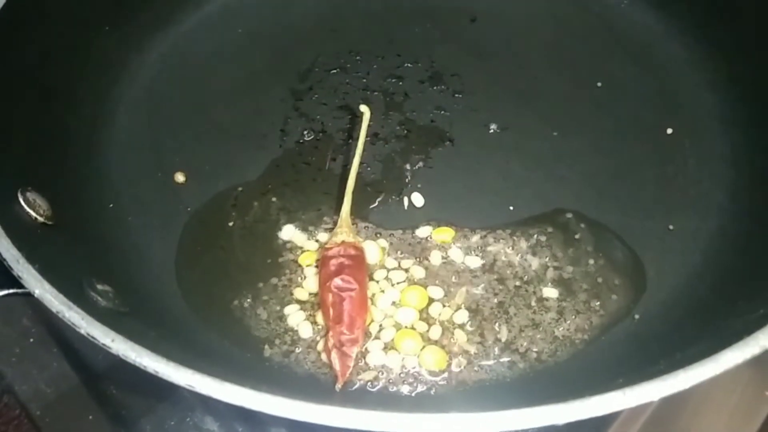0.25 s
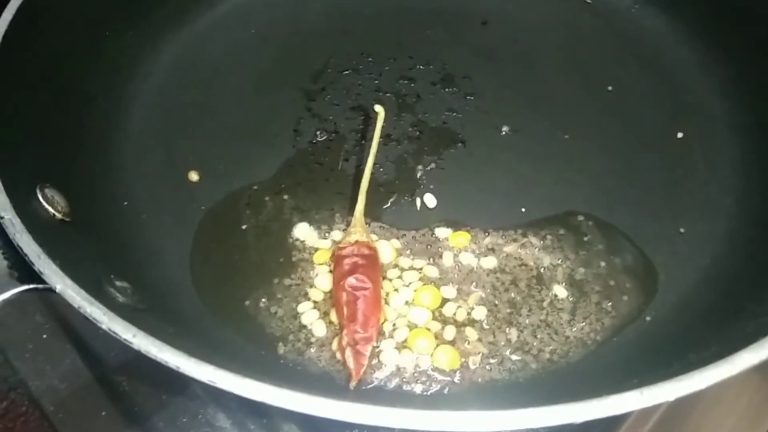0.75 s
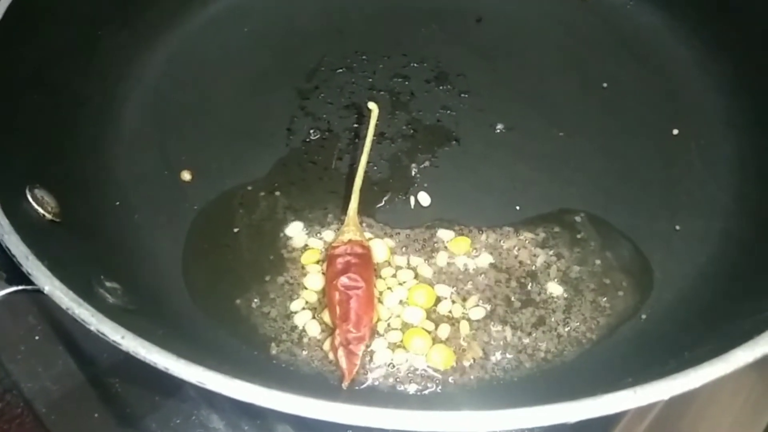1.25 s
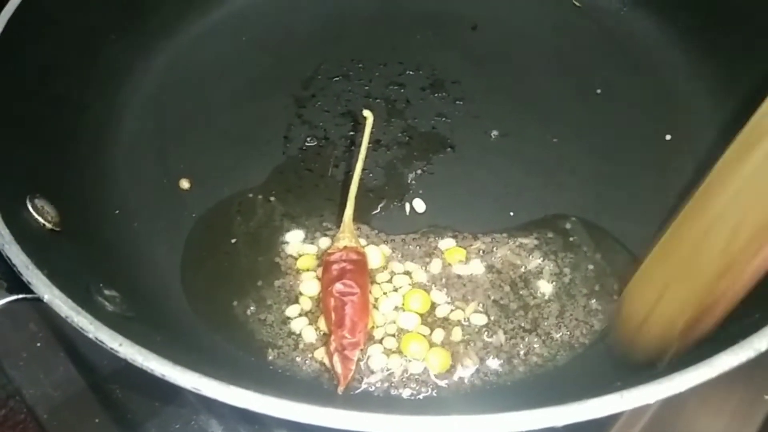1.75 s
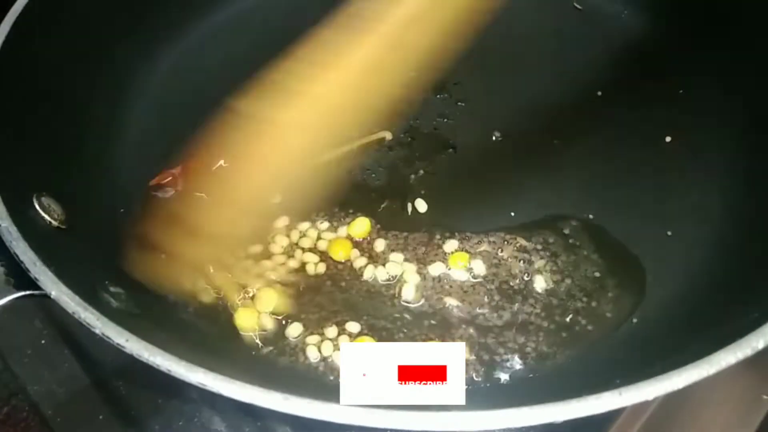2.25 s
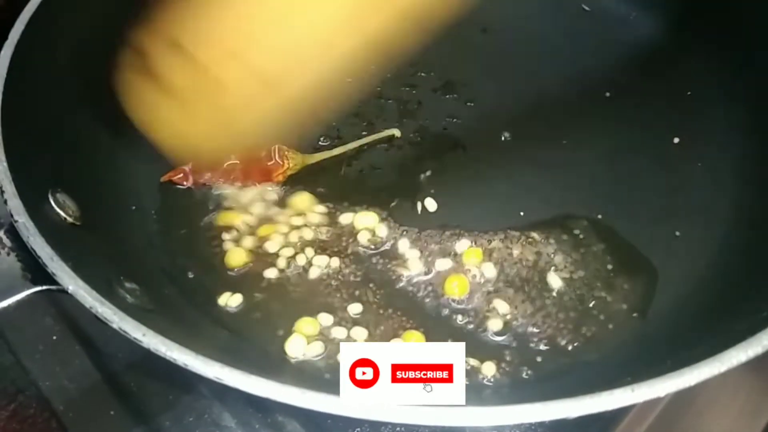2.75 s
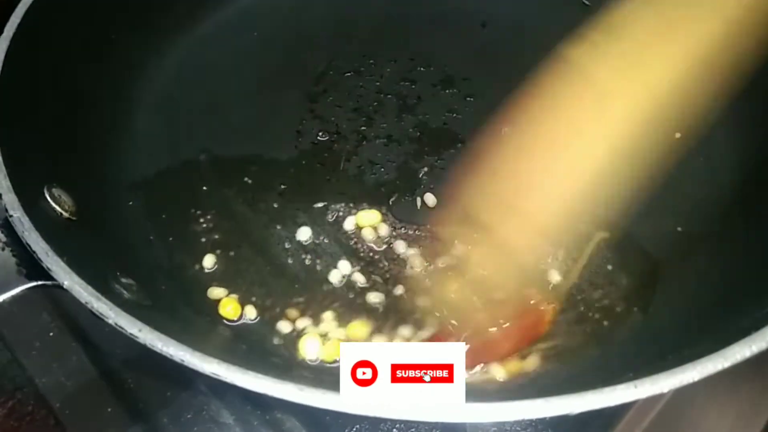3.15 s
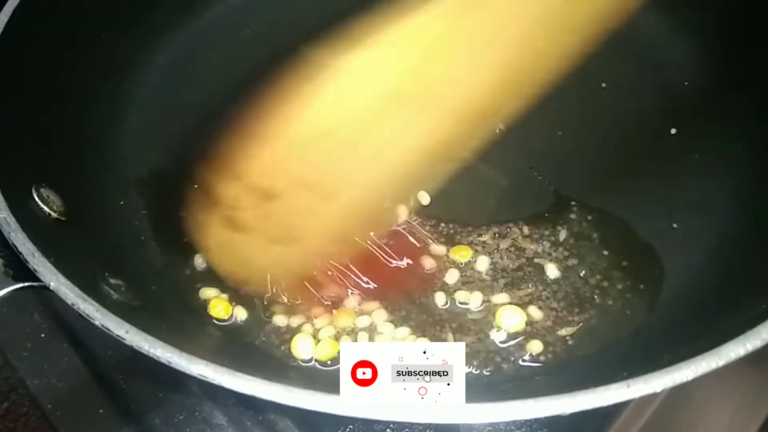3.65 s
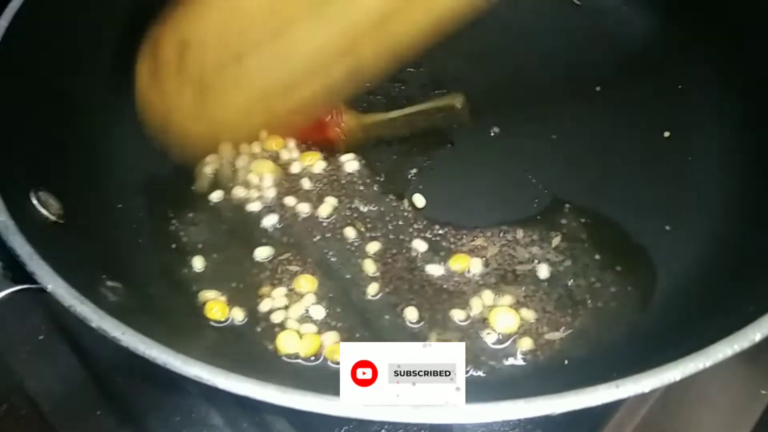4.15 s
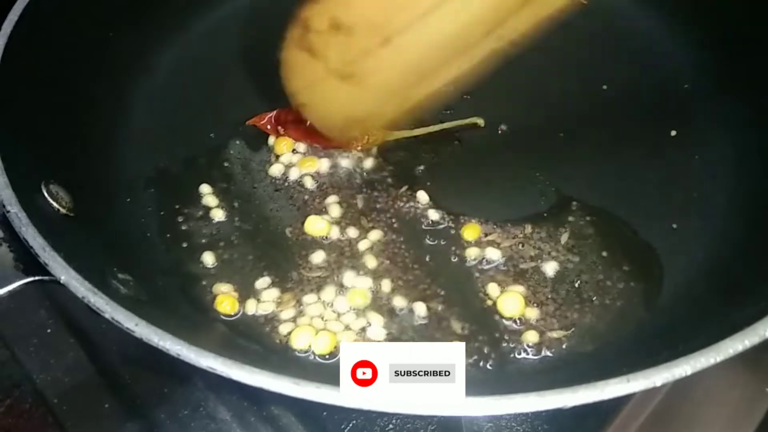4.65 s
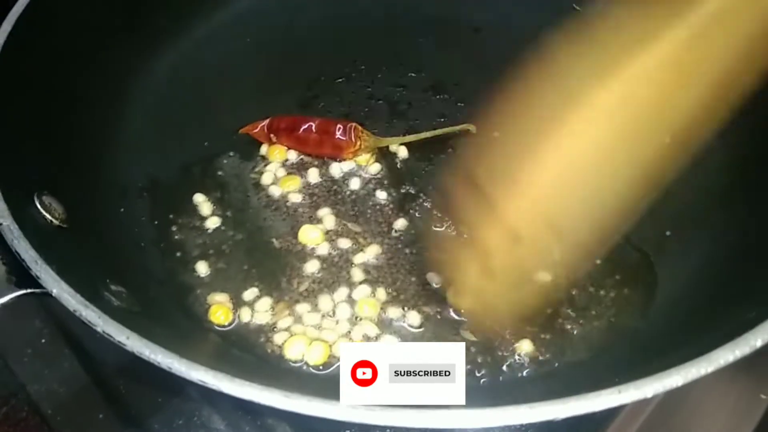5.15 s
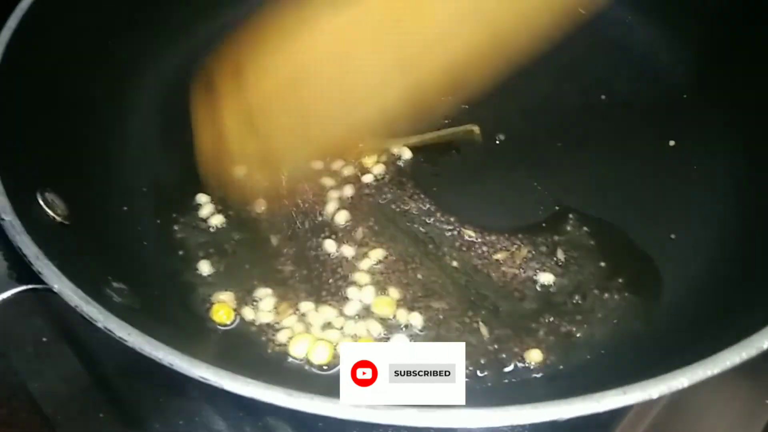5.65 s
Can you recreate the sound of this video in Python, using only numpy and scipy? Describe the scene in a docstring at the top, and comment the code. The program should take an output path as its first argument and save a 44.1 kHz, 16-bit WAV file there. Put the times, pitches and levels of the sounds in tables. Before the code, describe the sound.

A close microphone over a frying pan catches a steady fine sizzle with a low rumble beneath. Cookware rattles briefly near the start, with hard-walled kitchen echo. After a calm moment, wood clacks and rubs grittily on the ringing pan in quick repeated strokes, the sizzle swelling each time. It finishes thinner and higher, with crackling seed pops.

```python
"""Seeds and lentils sizzle in a little oil in a pan, heard from close above in a small kitchen.
Noise and random clicks, coloured by filters, make the sizzle; it swells at each knock and spatula stroke.
After a soft thump, cookware clatters once: short noise bursts through metal resonances. Then a wooden spatula
knocks (noise clacks, booms, ringing tones) and scrapes (random jolts) about three times a second.
Seeds pop as tiny noise bursts, more towards the end; a low rumble and two faint wavering tones lie underneath."""
import sys
import numpy as np
from scipy import signal
from scipy.fft import rfft, irfft, next_fast_len
from scipy.io import wavfile
from scipy.ndimage import map_coordinates

SR = 44100
rng = np.random.default_rng(int(sys.argv[2]) if len(sys.argv) > 2 else 0)


def to_wav(sig):
    """Store sig (one row per channel, or 1-D mono) as 16-bit WAV at the path in sys.argv[1].

    Samples outside -1..1 are clipped; the rate is SR.
    """
    pcm = np.clip(np.atleast_2d(sig), -1, 1) * 32767
    pcm = np.round(pcm).astype(np.int16)
    wavfile.write(sys.argv[1], SR, pcm.T)  # frames by channels


N = 260707  # length in samples

# All spectra and resonance levels are relative; the functions set the loudness of each layer.
# bubbling of the undisturbed oil: (t/s, level/dB)
SIMMER_LEVEL = [(0.19, -51), (0.43, -42), (0.93, -50), (1.35, -50), (3.4, -50.5), (4.4, -48.5),
                (5.43, -47.5), (5.84, -45.5)]
# sweeps of the spatula: (t/s of hardest push, force level/dB, swell/s, release/s, oil flare level/dB)
SPATULA_STROKES = [(1.561, -33, 0.1, 0.17, -36.5), (1.809, -42, .04, 0.18, -47.5),
                   (1.961, -35, 0.063, 0.044, -42.5), (2.288, -37, 0.15, 0.11, -37),
                   (2.582, -31.5, 0.048, .13, -37.5), (2.961, -40, 0.15, 0.2, -42),
                   (3.206, -36.5, 0.022, 0.19, -42), (3.53, -39, 0.078, 0.34, -41.5),
                   (3.832, -39, 0.15, 0.14, -41), (4.199, -32.5, 0.086, 0.079, -40),
                   (4.555, -35, 0.074, .14, -39.5), (4.892, -39, 0.033, 0.17, -40.5),
                   (5.289, -37.5, 0.064, 0.19, -42.5), (5.46, -46.5, 0.12, 0.075, -63)]
# knocks on the pan, first a soft thump, then the wooden spatula: (t/s, clack peak level/dB,
# belly level/dB before its gain, ring level/dB before its gain, belly f/Hz)
PAN_KNOCKS = [(0.031, -40.5, -43.5, -53, 306), (1.409, -25.5, -39.5, -42.5, 288),
              (1.817, -16.5, -38, -47, 305), (2.12, -11, -36.5, -43.5, 262),
              (2.522, -17.5, -36, -46.5, 298), (2.835, -35.5, -42, -52.5, 225), (3.222, -41, -51, -43, 200),
              (3.47, -28.5, -36.5, -41, 238), (3.802, -35, -53, -47, 247),
              (4.073, -20.5, -34.5, -40.5, 232), (4.458, -56.5, -39.5, -76, 224),
              (4.8, -16.5, -37.5, -48, 212), (5.176, -60, -46.5, -83, 197)]
# colour of the sizzle, first the fuller one, then the finer one: (f/Hz, level/dB)
OIL_SPECTRUM = [(700, -41), (1200, -34), (1480, -10.5), (1750, -8.5), (2250, -10), (2700, 3.5), (3100, 3),
                (3900, -7), (4600, -14), (5200, -6.5), (6500, -2.5), (7800, 3), (9500, -7), (12000, -17),
                (15500, -22.5)]
FINE_OIL_SPECTRUM = [(800, -53), (1400, -15), (2300, 2), (3300, -8.5), (5000, -3), (6000, 1), (7900, 2),
                     (10000, -3), (15500, -8.5)]
# colour of the stove's low rumble: (f/Hz, level/dB)
RUMBLE_SPECTRUM = [(25, -15), (60, 1.5), (113, 0), (200, -16.5), (300, -11.5), (420, -22), (1000, -24.5),
                   (3000, -37)]
# faint wavering hum in the kitchen: (f/Hz, level/dB)
HUM_TONES = [(113, -79.5), (296, -78)]
# faint rubbing: a dying remnant of an earlier sound at first,
# then cookware sliding before it clatters: (t/s, level/dB)
FAINT_RUBBING = [(0, -55), (0.265, -67), (0.29, -46), (0.36, -54.5), (0.42, -52.5), (0.5, -56.5)]
# colour of the rubbing on the pan: (f/Hz, level/dB)
RUB_SPECTRUM = [(50, -20.5), (100, -18), (170, -18.5), (290, -13), (430, -34), (640, -13.5), (1200, -7.5),
                (1900, -17), (2300, -4), (2750, 4), (3200, -14.5), (3650, -1), (4400, -14), (6000, 0),
                (14000, -49.5)]
# voices of seeds grating under the blade: (f/Hz, sharpness Q, level/dB)
GRIT_VOICES = [(1135, 10, -6), (1909, 23, -3.5), (2400, 34, -5), (2790, 26, 2.5), (3180, 17, -14),
               (3600, 15, 3.5), (6600, 4.6, -5.5)]
# colour of the husks: (f/Hz, level/dB)
HUSK_SPECTRUM = [(600, -18), (2500, 1.5), (4500, -8.5), (7800, 6.5), (10500, -4), (15000, -11.5)]
# colour of the pan belly: (f/Hz, level/dB)
BELLY_SPECTRUM = [(30, -14.5), (70, 7.5), (200, 3), (310, 2.5), (420, -7.5), (620, 8.5), (900, 2),
                  (1500, -18), (4000, -80)]
# ringing tones of the pan wall, the main ring first: (f/Hz, level/dB, time to fall 60 dB/s)
WALL_MODES = [(632.5, 3, 0.3), (776, -8.5, 0.079), (880, 6.5, 0.072), (1027, -5, 0.16), (1082.4, 5, 0.086),
              (1440, -5, 0.046), (1490, 10, 0.05), (1966, -14, 0.13), (2290, -26, 0.063), (2530, -1, 0.054)]
# colour of the wooden blade: (f/Hz, level/dB)
WOOD_SPECTRUM = [(300, -10.5), (900, 2.5), (1500, 2), (2700, 11), (3500, 3), (5000, -8), (12000, -17)]
# seeds that ping off the metal: (t/s, peak level/dB, f/Hz, time to fall 60 dB/s)
SEED_PINGS = [(0.21, -37, 7650, 0.08), (0.278, -39, 1475, 0.076), (0.278, -32.5, 7600, 0.023),
              (1.994, -37, 12900, 0.027), (2.213, -22.5, 9070, 0.022), (4.457, -33.5, 3440, 0.033),
              (5.4382, -27.5, 2700, 0.038), (5.4998, -13, 7280, 0.011)]
# seeds that burst in the hot oil: (t/s, peak level/dB, centre f/Hz)
SEED_POPS = [(1.3899, -11, 3430), (1.551, -16, 5840), (3.812, -21, 3500), (4.187, -22.5, 6500),
             (5.2398, -20, 4500), (5.486, -18, 7240), (5.6562, -7, 1900), (5.6824, -10.5, 7900),
             (5.6932, -15, 7810), (5.724, -20, 8000), (5.7362, -23.5, 9200), (5.8558, -14, 7440),
             (5.8824, -15, 7460)]
# snaps of the blade over a seed: (t/s, peak level/dB)
BLADE_SNAPS = [(1.79, -25), (1.856, -24.5), (1.954, -26.5), (2.1034, -17.5), (2.3307, -21), (2.369, -23),
               (2.8324, -18.5), (3.1873, -24.5), (3.2008, -19), (3.468, -24.5), (3.522, -22.5),
               (3.7923, -26.5), (4.2005, -29.5), (4.5409, -25), (4.8776, -28), (5.2618, -21),
               (5.301, -18.5)]
# hard contacts of the rattling cookware: (t/s, clash level/dB before filtering,
# thud level/dB before filtering and gain, clash time to fall 60 dB/s)
CLATTER_HITS = [(0.5011, -26.5, -32.5, 0.17), (0.5167, -15.5, -25.5, 0.1), (0.537, -13, -29.5, 0.028),
                (0.543, -11.5, -27.5, 0.038), (0.5609, -14, -40, 0.057), (0.5671, -10, -33, 0.023),
                (0.594, -12.5, -32.5, 0.072), (0.6085, -19.5, -33, 0.041), (0.6407, -23, -48, 0.024)]
# resonances of the clashing metal: (f/Hz, sharpness Q, level/dB before its gain)
METAL_RESONANCES = [(1530, 5.2, -12.5), (2925, 63, 4.5), (5880, 33, -6.5), (7670, 39, 1), (8190, 72, -3)]
# colours of the clash and the thud: (f/Hz, level/dB)
CLASH_SPECTRUM = [(900, -31), (1800, -10), (2900, -3.5), (4300, -5.5), (6000, -3.5), (7900, 3.5),
                  (9500, -6), (11500, -12.5), (15500, -44)]
THUD_SPECTRUM = [(40, -38), (70, -6.5), (170, -1), (350, 1), (550, -6), (1000, -5.5), (1450, -0.5),
                 (2000, -9), (4000, -60)]
# booms of the stove top under the pan: (f/Hz, level/dB, time to fall 60 dB/s)
STOVE_MODES = [(71, -12, 1), (110.6, -8, 0.81), (132.7, -4, 0.65), (176, -1.5, .45), (209.2, 0.5, 0.29),
               (290, -1.5, 0.55), (364, 6, 0.095)]
# echo of the kitchen: (f/Hz, time to fall 60 dB/s)
KITCHEN_DECAY = [(100, 0.63), (400, 0.39), (3000, .36), (8000, 0.37), (15000, 0.64)]

THINS_AT_S = 5.48  # from here the sizzle is finer and higher
FADE_DB = 21.5  # level change over one swell or release time
FLARE_LAG_S, FLARE_SWELL_S, FLARE_SETTLE_S = 0.003, 0.14, 0.2  # oil flares just after the push
SPLASH_DB, SPLASH_SWELL_S, SPLASH_SETTLE_S = -52.5, 0.012, 0.089  # each knock splashes the oil
BELLY_CYCLES = 101  # the boom falls 60 dB in this many cycles, so low spots boom longer
OVERTONE_DB, OVERTONE_GROWTH = -33, 0.65  # overtones at a 0 dB clack; dB they gain per dB of clack
SNAP_HZ, SNAP_Q = 2940, 4.8
POP_Q = 0.59
CLACK_HZ = 2200  # centre of the clack
TOP_HZ = 15600  # nothing is kept from here upwards


def amp(db):
    """Turn decibels into a gain."""
    return 10 ** (np.asarray(db) / 20)


def unit(x):
    """Scale to an average strength (rms) of 1."""
    return x / np.sqrt(np.mean(x ** 2) + 1e-20)


def peaked(x):
    """Scale so that the highest peak is 1."""
    return x / np.abs(x).max()


def along(points, hz):
    """Read values between (f/Hz, value) points, on a log frequency axis."""
    f, v = np.transpose(points)
    return np.interp(np.log(hz + 1), np.log(f), v)


def level(rows, outside_db=None):
    """Turn (t/s, level/dB) rows into one gain per sample."""
    times, levels = np.transpose(rows)
    return amp(np.interp(np.arange(N) / SR, times, levels, left=outside_db, right=outside_db))


def coloured(x, gain_db):
    """Filter x by a gain that depends on frequency, with no sound ahead of its cause."""
    size = 8192
    gain = amp(gain_db(np.fft.rfftfreq(size, 1 / SR)))
    cepstrum = irfft(np.log(gain + 1e-6))
    # folding the cepstrum onto its first half puts the filter's energy as early as possible
    cepstrum[1:size // 2] *= 2
    cepstrum[size // 2 + 1:] = 0
    response = irfft(np.exp(rfft(cepstrum)))
    return signal.fftconvolve(x, response)[:len(x)]


def shaped(x, spectrum):
    """Filter x by a (f/Hz, level/dB) curve."""
    return coloured(x, lambda hz: along(spectrum, hz))


def resonant(x, centre_hz, q):
    """Pass x through one resonance; a larger q is sharper."""
    def gain_db(hz):
        detune = (hz + 1) / centre_hz - centre_hz / (hz + 1)
        return -10 * np.log10(1 + (q * detune) ** 2)
    return coloured(x, gain_db)


def wobble(rate):
    """Draw a smooth random curve through rate points a second."""
    knots = rng.standard_normal(int(N * rate / SR) + 4)
    return map_coordinates(knots, [np.arange(N) * rate / SR])


def grains(rate, spread_db):
    """Scatter about rate clicks a second, of random size and sign, rms 1."""
    hits = rng.random(N) < rate / SR
    signs = rng.choice([-1, 1], N)
    sizes = amp(spread_db * np.clip(rng.standard_normal(N), -2, 2))
    return unit(hits * signs * sizes)


def burst(t, t60):
    """Noise that falls 60 dB in t60 seconds."""
    return rng.standard_normal(len(t)) * amp(-60 * t / t60)


def ring(modes, t, scatter_db):
    """Sum of dying tones, each struck with a random strength and sign."""
    total = np.zeros(len(t))
    for hz, db, t60 in modes:
        strike_db = db + scatter_db * rng.standard_normal()
        total += rng.choice([-1, 1]) * amp(strike_db - 60 * t / t60) * np.sin(2 * np.pi * hz * t)
    return total


def add(track, s, sound):
    """Mix a sound into the track at time s."""
    part = track[max(round(s * SR), 0):][:len(sound)]
    part += sound[:len(part)]


def swell(s, db, rise_s, fall_s):
    """A gain that climbs to db at time s and sinks again, evenly in dB."""
    t = np.arange(N) / SR - s
    return amp(db - FADE_DB * np.maximum(-t / rise_s, t / fall_s))


def oil_level():
    """The oil simmers on its own and flares at each knock on the pan and each sweep of the spatula."""
    gains = [level(SIMMER_LEVEL)]
    for s, _, _, _, flare_db in SPATULA_STROKES:
        gains.append(swell(s + FLARE_LAG_S, flare_db, FLARE_SWELL_S, FLARE_SETTLE_S))
    for s, *_ in PAN_KNOCKS:
        gains.append(swell(s, SPLASH_DB, SPLASH_SWELL_S, SPLASH_SETTLE_S))
    return np.sqrt(sum(gain ** 2 for gain in gains))  # add as powers


def hum():
    """Two faint tones waver in level and phase."""
    t = np.arange(N) / SR
    total = np.zeros(N)
    for hz, db in HUM_TONES:
        gain = amp(db + 3 * wobble(8)) * np.sqrt(2)
        total += gain * np.sin(2 * np.pi * hz * t + 0.7 * wobble(12))
    return total


def sizzle(oil_db=0, fine_db=-2, rumble_db=-70):
    """Thousands of tiny steam bubbles burst each second, over hum and the low rumble of the stove."""
    thin = np.clip((np.arange(N) / SR - THINS_AT_S) / 0.01, 0, 1)  # 0 = full sizzle, 1 = fine
    bubbles = unit(grains(rate=5000, spread_db=4) + 0.95 * rng.standard_normal(N))
    bubbles *= amp(0.16 * wobble(25))  # slight flicker in level
    oil = amp(oil_db) * unit(shaped(bubbles, OIL_SPECTRUM))
    fine = amp(fine_db) * unit(shaped(bubbles, FINE_OIL_SPECTRUM))
    stove = amp(rumble_db) * unit(shaped(rng.standard_normal(N), RUMBLE_SPECTRUM))
    frying = oil_level() * ((1 - thin) * oil + thin * fine)
    # the rumble and hum drop by a quarter as the sizzle thins
    return frying + (1 - 0.25 * thin) * (stove + hum())


def blade_force():
    """In each sweep the hand leans in and lets go."""
    return sum(swell(s, db, rise_s, fall_s) for s, db, rise_s, fall_s, _ in SPATULA_STROKES)


def scrape(rub_db=-4.0, grit_db=-1.5, wall_db=-17, drum_db=-16):
    """The blade catches and slips: fine jolts rub and ring the pan, coarse ones grate single seeds."""
    force = blade_force() + level(FAINT_RUBBING, outside_db=-120)
    force = force * unit(amp(2.2 * wobble(110)))  # fast uneven pressure
    jolts = unit(grains(rate=650, spread_db=7) + 0.38 * rng.standard_normal(N))
    rub = amp(rub_db) * unit(shaped(jolts, RUB_SPECTRUM))
    wall_ring = ring(WALL_MODES, np.arange(SR // 2) / SR, scatter_db=1)
    wall = amp(wall_db) * unit(signal.fftconvolve(jolts, wall_ring)[:N])
    # the dragged blade keeps the belly rumbling
    drum = amp(drum_db) * unit(shaped(resonant(jolts, 190, q=2.43), BELLY_SPECTRUM))
    seeds = np.zeros(N)
    for hz, q, db in GRIT_VOICES:
        seeds += amp(db) * unit(resonant(grains(rate=70, spread_db=4.0), hz, q))
    grit = amp(grit_db) * unit(shaped(seeds, HUSK_SPECTRUM))
    return force * (rub + drum + grit + wall)


def knocks(clack_db=0, belly_gain_db=1, ring_gain_db=3):
    """A knock is a short clack, a booming pan belly whose pitch depends on the spot, and the ringing wall."""
    out, t = np.zeros(N), np.arange(SR // 2) / SR
    for s, db, belly_db, ring_db, belly_hz in PAN_KNOCKS:
        rise = 1 - np.exp(-t / (0.00028 * amp(-db / 2)))  # a gentler blow presses in more slowly
        contact = (burst(t, t60=0.014) + 0.0091 * burst(t, t60=0.032)) * rise
        clack = peaked(shaped(resonant(contact, CLACK_HZ, q=0.18), WOOD_SPECTRUM))
        boom = unit(shaped(resonant(rng.standard_normal(len(t)), belly_hz, q=4.34), BELLY_SPECTRUM))
        belly = amp(belly_db + belly_gain_db - 60 * t * belly_hz / BELLY_CYCLES) * boom
        main = amp(ring_db + ring_gain_db) * ring(WALL_MODES[:1], t, scatter_db=1)
        overtone_db = OVERTONE_DB + OVERTONE_GROWTH * db
        overtones = amp(overtone_db) * ring(WALL_MODES[1:], t, scatter_db=2)
        add(out, s, amp(db + clack_db) * clack + rise * (belly + main + overtones))
    return out


def pops(pop_db=0, ping_db=0):
    """A husk cracks for a few milliseconds with a faint spit of oil; a flung seed rings briefly."""
    out, t = np.zeros(N), np.arange(SR // 6) / SR
    cracks = [(s, db, SNAP_HZ, SNAP_Q) for s, db in BLADE_SNAPS]
    cracks += [(s, db, hz, POP_Q) for s, db, hz in SEED_POPS]
    for s, db, hz, q in cracks:
        crack = burst(t, t60=0.004) + 0.1 * burst(t, t60=0.025)  # husk, then spit of oil
        sound = peaked(shaped(resonant(crack, hz, q), HUSK_SPECTRUM))
        add(out, s + 0.00048, amp(db + pop_db) * sound)
    for s, db, hz, t60 in SEED_PINGS:
        ping = resonant(resonant(burst(t, t60), hz, q=6.2), hz, q=6.2)
        add(out, s, amp(db + ping_db) * peaked(ping))
    return out


def clatter(clash_db=0, metal_db=-1, thud_gain_db=17, boom_db=-12, grind=0.17):
    """Metal rattles on metal: gritty clashes with bright resonances, thuds and booms of the stove top."""
    clashes, thuds, boom = np.zeros(N), np.zeros(N), np.zeros(N)
    t = np.arange(SR) / SR
    rise = 1 - np.exp(-t / 0.0007)
    for s, db, thud_db, t60 in CLATTER_HITS:
        add(clashes, s, amp(db) * (burst(t, t60) + grind * burst(t, t60=0.28)) * rise)
        add(thuds, s, amp(thud_db) * burst(t, t60=0.091))
        add(boom, s, amp(thud_db + boom_db) * ring(STOVE_MODES, t, scatter_db=1.0))
    metal = sum(amp(db + 10.5) * resonant(clashes, hz, q) for hz, q, db in METAL_RESONANCES)
    clash = amp(clash_db) * shaped(clashes, CLASH_SPECTRUM)
    thud = amp(thud_gain_db) * shaped(thuds, THUD_SPECTRUM)
    return clash + amp(metal_db) * metal + thud + boom


def kitchen(x):
    """Hard walls answer with a noise-like echo; each frequency dies at its own speed."""
    hz, t, z = signal.stft(rng.standard_normal(SR), SR, nperseg=256)
    t60 = along(KITCHEN_DECAY, hz)[:, None]
    tail = signal.istft(z * amp(-60 * t / t60), SR, nperseg=256)[1]
    tail[:SR // 250] = 0  # the first 4 ms are silent
    return signal.fftconvolve(x, tail / np.linalg.norm(tail))[:N]


def scene(room_db=-6):
    """Mix the close pan sounds with their kitchen echo and the sizzle, which has no echo."""
    pan = scrape() + knocks() + pops() + clatter()
    return (pan + amp(room_db) * kitchen(pan) + sizzle())[None]


def record(dry):
    """Remove every frequency from TOP_HZ upwards."""
    size = next_fast_len(N + SR // 2)
    kept = np.fft.rfftfreq(size, 1 / SR) < TOP_HZ
    return irfft(rfft(dry, size) * kept, size)[:, :N]


dry = scene()
out = record(dry)
to_wav(out)
```